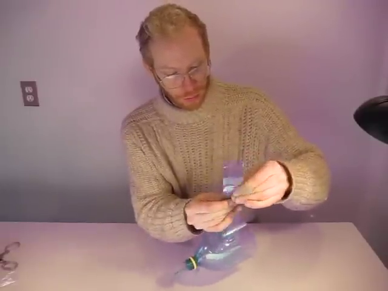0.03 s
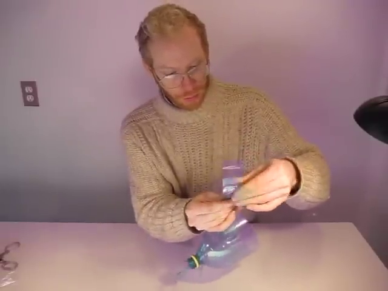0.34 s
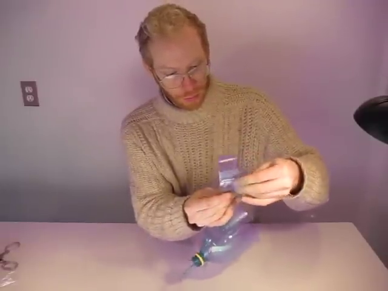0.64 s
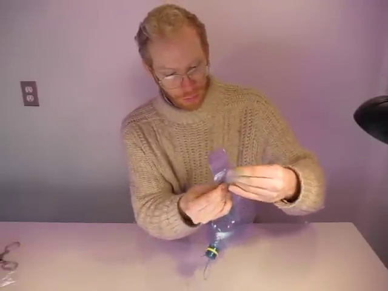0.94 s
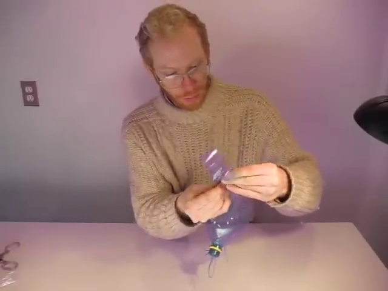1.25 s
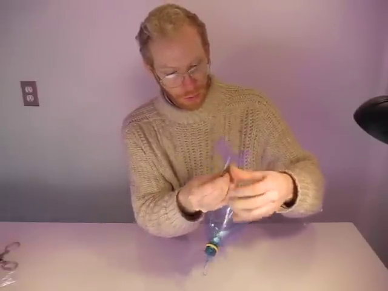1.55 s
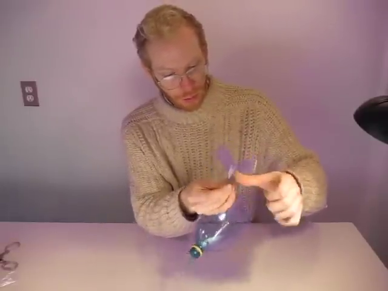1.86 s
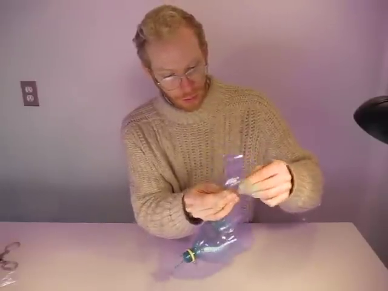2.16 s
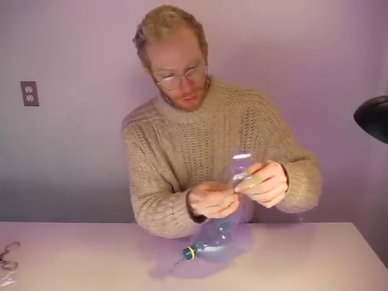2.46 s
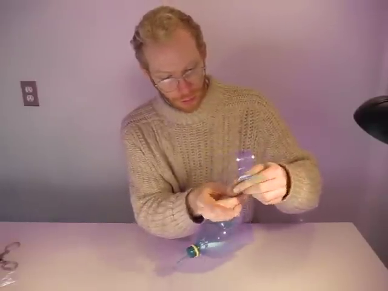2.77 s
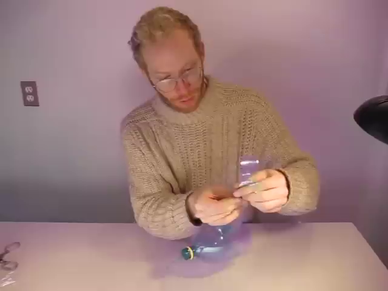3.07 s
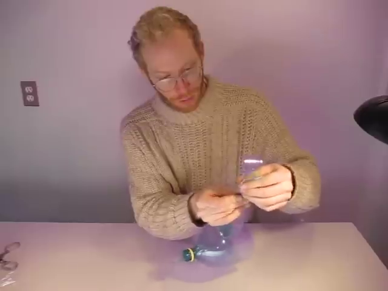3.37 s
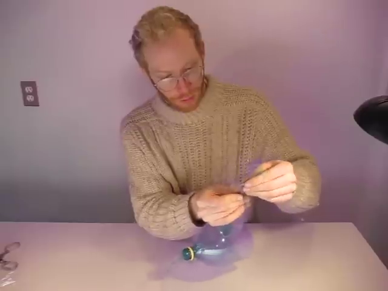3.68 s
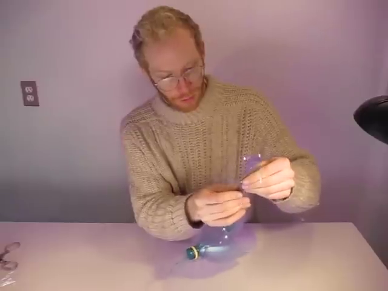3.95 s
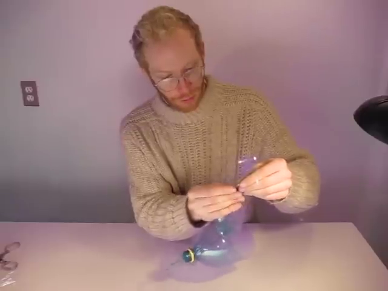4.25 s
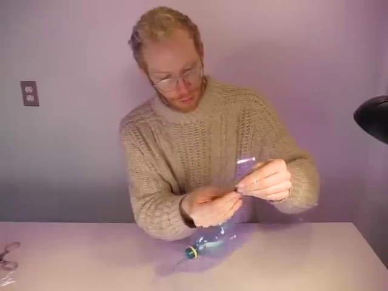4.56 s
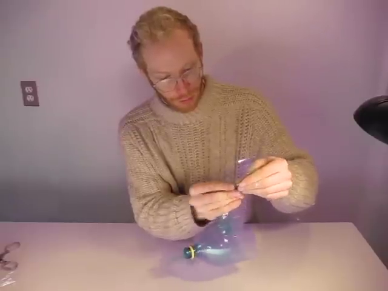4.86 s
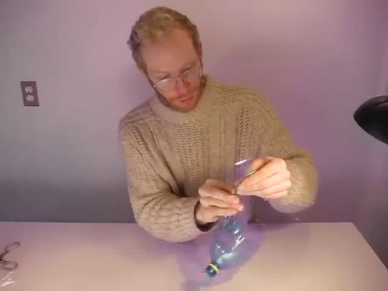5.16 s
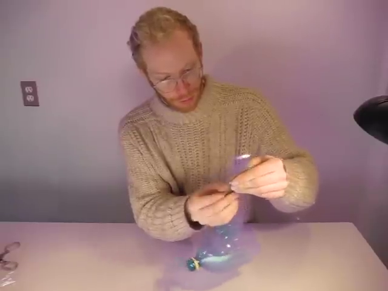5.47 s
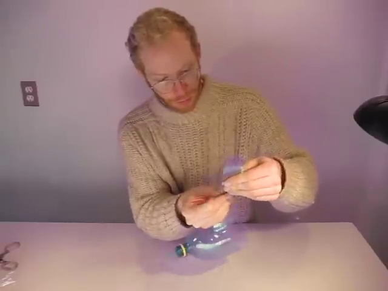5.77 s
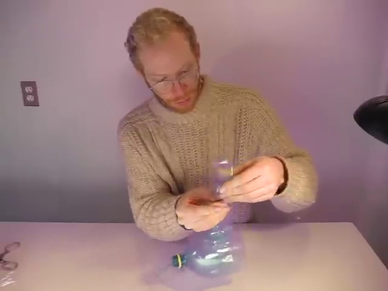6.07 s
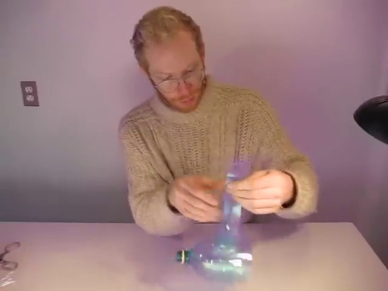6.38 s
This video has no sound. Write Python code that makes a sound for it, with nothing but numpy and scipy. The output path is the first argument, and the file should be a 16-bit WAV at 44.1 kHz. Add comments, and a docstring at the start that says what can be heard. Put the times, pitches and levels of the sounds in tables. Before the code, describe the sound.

Strips cut from a thin plastic bottle are bent and pushed together above a table in a small room. Sharp, irregular snaps open the sound and bunch into a quick crackle with a tiny squeak. A quieter stretch of rubbing and scattered clicks follows, then the snaps grow busier again, mixed with dull ticks and light hollow knocks. One microphone picks it all up over a low, steady ventilation hum.

```python
"""Sharp plastic snaps, with dull ticks, hollow knocks, rubbing and squeaks, over a low ventilation hum.
Strips cut from a thin bottle are bent and pushed into each other above a table in a small room.
The strips buckle and snap, the bottle wall ticks as it flexes, and jolts make the whole bottle knock.
Cut edges drag and squeak, fingers hiss. One microphone feeds both channels."""
import sys
import numpy as np
from scipy import signal
from scipy.fft import rfft, irfft, next_fast_len
from scipy.io import wavfile

SR = 44100
rng = np.random.default_rng(int(sys.argv[2]) if len(sys.argv) > 2 else 0)


def digitize_waveform(pressure):
    """Quantize a signal to 16-bit integers and store it at the path in sys.argv[1].

    Rows of a 2-D input are taken as channels; values are limited to [-1, 1].
    """
    field = np.atleast_2d(pressure).T
    bounded = np.clip(field, -1, 1)
    quanta = np.round(bounded * 32767).astype(np.int16)
    wavfile.write(sys.argv[1], SR, quanta)


N = 287532
TAIL_SAMPLES = SR // 3
ATTACK_SAMPLES = round(.011 * SR)  # span that sets a click's level

# Spectra: freq_hz, relative_db
HUM_SPECTRUM = [(11, -0.5), (18, 1.5), (43, -2.5), (69, -5), (96, -9), (151, -14.5), (193, -16), (342, -21),
                (400, -26), (520, -31.5), (880, -120)]  # ventilation rumble
AIR_SPECTRUM = [(180, -19.5), (300, -12.5), (392, -7), (584, -6.5), (645, -7.5), (1030, -10.5),
                (1320, -11.5), (2320, -15.5), (2790, -14), (4300, -17.5), (13000, -25), (16000, -32)]  # ventilation hiss
ROOM_SPECTRUM = [(200, -7.5), (700, 1), (2000, -0.5), (5000, -4), (9000, -3.5), (13000, -3), (15500, -14)]  # room reflections
CREASE_SPECTRUM = [(200, -28), (700, -10), (1500, -7), (2400, 3), (3600, 7), (6000, -1), (11000, -13),
                   (16000, -13)]  # tiny folds
DRAG_SPECTRUM = [(150, -21), (450, -6.5), (700, -3.5), (1200, -8.5), (2200, -2), (3500, 1), (4500, -3.5),
                 (5500, 0), (7000, -30), (14000, -34)]  # sliding cut edges
FINGER_SPECTRUM = [(300, -30), (2000, -17), (4000, 0.5), (6000, 3), (9000, 0.5), (13000, -4), (16000, -17)]  # sliding fingers
TICK_SPECTRUM = [(300, -22), (700, -13), (1400, -24), (1800, -14), (2200, 1), (2700, -5.5), (3500, 2.5),
                 (4100, -11.5), (4700, -9), (5400, -19), (6500, -19), (12000, -30)]  # flexing bottle wall
KNOCK_SPECTRUM = [(100, -27), (270, -2), (500, -1.5), (720, -4.5), (1100, -5.5), (1850, -9), (2600, -14),
                  (8000, -18)]  # jolted bottle

# Room decay: freq_hz, t60_s
ROOM_DECAY = [(200, 0.65), (800, 0.37), (2100, 0.5), (5500, 0.43), (10000, 0.38), (15000, 0.32)]
# Resonances of bottle and strips: freq_hz, width_hz, gain_db
BOTTLE_MODES = [(273, 42, -3), (505.4, 17, 3), (691.7, 27, 5.5), (840, 58, -6), (1156, 14, 0),
                (1290, 39, -2.5), (1853, 46, -5), (2225, 18, -9), (2563, 26, -15), (2910, 20, -3),
                (3860, 46, -5.5), (5270, 60, -7), (6500, 30, -24), (7100, 45, -6), (7800, 200, -15),
                (10600, 170, -34)]

# Event levels are relative within each layer.
# Edges and fingers sliding: start_s, length_s, drag_db, hiss_db
SLIDE_STROKES = [(0.088, 0.076, -66, -51.5), (.47, 0.086, -54, -53.5), (1.275, 0.163, -49, -53),
                 (1.452, 0.019, -51.5, -39), (1.866, 0.021, -48, -46.5), (1.904, 0.048, -51.5, -53),
                 (2.307, 0.26, -57, -65), (2.552, 0.14, -52, -56), (2.63, 0.01, -37, -45),
                 (3.065, 0.051, -73, -60), (3.135, 0.13, -54.5, -53), (3.256, 0.067, -52, -57.5),
                 (3.516, 0.065, -49.5, -52.5), (3.834, .14, -67, -66), (3.987, 0.021, -56, -56),
                 (4.748, .12, -56, -68), (4.91, 0.093, -57, -56.5), (5.06, 0.049, -48.5, -55),
                 (5.104, 0.025, -53, -43), (5.344, 0.14, -47.5, -59), (5.472, 0.094, -49, -57.5),
                 (5.548, 0.036, -36.5, -53), (5.69, 0.044, -49, -59), (5.742, 0.021, -36.5, -41),
                 (5.797, 0.064, -44.5, -66), (6.273, 0.053, -56, -60)]
# Edge skidding on edge: centre_s, pitch_hz, peak_db, half_length_s
EDGE_SQUEAKS = [(1.4746, 10260, -23, 0.0013), (1.4752, 8170, -30, 0.0021), (1.4923, 9720, -17.5, 0.00092)]
# Wall flexing: start_s, level_db
WALL_TICKS = [(1.422, -49), (2.766, -55), (2.919, -56.5), (3.109, -54.5), (3.379, -51), (3.502, -49),
              (4.54, -45.5), (5.03, -43.5), (5.046, -51), (5.255, -45), (5.451, -40), (5.573, -43.5),
              (5.584, -42), (5.6355, -38.5), (5.645, -43)]
# Bottle jolts: start_s, level_db, pitch_hz
BOTTLE_KNOCKS = [(.109, -45, 680), (.327, -41, 271), (.581, -44.5, 686), (.767, -46, 770),
                 (1.263, -48, 694), (1.505, -48, 400), (2.643, -41, 1090), (2.65, -40, 327),
                 (2.9, -55, 1840), (5.562, -51.5, 694), (5.59, -52, 675), (5.668, -53, 690),
                 (5.758, -42, 680), (5.83, -55, 740), (6.405, -37, 510)]
# Strips buckling: start_s, level_db, body_db, edge_db, slip_s, pitch_hz
# Body (near 600 Hz) and edge (11 kHz) are relative to 5 kHz.
STRIP_SNAPS = [(0.0514, -26.5, -18.5, -11, 0.0019, 5930), (.1652, -51, 2, 5, .0013, 5500),
               (.2036, -39.5, -8, -4.5, 0.00038, 4640), (0.3251, -26, -10.5, -16.5, .00023, 3500),
               (0.5798, -20.5, -16.5, -10, 0.00038, 4100), (0.6662, -40.5, -5.5, -21, 0.0014, 4710),
               (0.7663, -45.5, 2.5, -2, 0.00098, 8650), (1.1725, -46, -17, -3, .0006, 7020),
               (1.1893, -25.5, -23, 0.5, 0.00048, 7700), (1.247, -41, -24, -12, 0.0032, 3870),
               (1.2543, -30.5, -19, -26, 0.0016, 3900), (1.2629, -28.5, -19, -9, 0.0014, 3900),
               (1.271, -33, -6, -3, 0.002, 4000), (1.3055, -26, -14.5, -12.5, 0.00032, 2570),
               (1.3407, -34, -14, -2, 0.00092, 6790), (1.3681, -28, -14.5, -19, 0.00072, 3900),
               (1.4477, -42, -10, -17, .0015, 3870), (1.474, -30, -13, -13, 0.0043, 4590),
               (1.4915, -29, -15, -12, 0.0034, 9800), (2.0433, -54, -10, 3, 0.00056, 5970),
               (2.1963, -55, -14, -12, .002, 5400), (2.2705, -42.5, -7, -3, .0045, 3580),
               (2.4047, -48.5, -6, -6, 0.0056, 2900), (2.488, -52, -21, -9, 0.0023, 6230),
               (2.5659, -40.5, -3.5, -4, 0.0066, 2580), (2.641, -38.5, -2, -8, 0.0022, 2660),
               (2.6492, -31, -4.5, -7.5, 0.0035, 1840), (3.139, -54, -10, 6, .0009, 9900),
               (3.6418, -37.5, -1, -8.5, 0.0023, 6940), (3.6497, -37, 5.5, -27, .0035, 3280),
               (4.0035, -41, -6.5, -8, 0.0032, 3570), (4.1124, -43.5, 3, -12, .002, 5000),
               (4.1192, -31, -1.5, 3.5, .0002, 3670), (4.1368, -31.5, -16, -4, 0.0004, 6250),
               (4.2365, -32, -15, -1.5, 0.0011, 6500), (4.6181, -53.5, 0, 2, .0003, 4070),
               (4.8583, -47.5, -13, -7, 0.00092, 5640), (4.8777, -36.5, -12, -6, 0.0019, 4110),
               (4.9914, -34.5, -9, 7.5, .003, 8240), (5.1409, -23.5, -23, -1, 0.0015, 4100),
               (5.16, -25.5, -10, -4.5, 0.0034, 5250), (5.557, -39, 3, -12, 0.00095, 3600),
               (5.668, -40, -7, -18, 0.0022, 2980), (5.758, -24, -8, -6.5, .0012, 4070),
               (5.9386, -28, -23, -8.5, 0.0014, 4900), (5.9491, -29, -19, -2.5, 0.00013, 6460),
               (6.1008, -40.5, -1, -10, .0025, 4790), (6.1092, -35.5, -18, -6, .0046, 6940),
               (6.1322, -31, -2.5, -7, 0.0011, 4000), (6.1451, -33.5, -10, -6, 0.0012, 3870),
               (6.386, -50, -10, -8, 0.0027, 4500), (6.4048, -22.5, -9.5, -10, .0004, 3730)]


def amp(db):
    """Decibels to gain."""
    return 10 ** (np.asarray(db) / 20)


def unit_rms(x):
    """Scale to rms 1."""
    return x / np.sqrt(np.mean(x ** 2) + 1e-20)


def log_interp(points, hz):
    """Read (freq_hz, value) points on a log frequency axis."""
    freq_hz, values = np.transpose(points)
    return np.interp(np.log(hz + 1), np.log(freq_hz + 1), values)


def coloured(x, spectrum):
    """Minimum-phase filter from (freq_hz, gain_db) points."""
    size = 2 * next_fast_len(len(x))
    gain = amp(log_interp(spectrum, np.fft.rfftfreq(size, 1 / SR)))
    cepstrum = irfft(np.log(gain), size)
    cepstrum[1:size // 2] *= 2
    cepstrum[size // 2 + 1:] = 0
    return irfft(rfft(x, size) * np.exp(rfft(cepstrum)), size)[:len(x)]


def resonate(x, modes):
    """x plus its ringing in (freq_hz, width_hz, gain_db) modes."""
    size = next_fast_len(len(x) + SR // 4)
    f = np.fft.rfftfreq(size, 1 / SR)
    ringing = sum(amp(db) * 1j * f * width_hz / (hz ** 2 - f ** 2 + 1j * f * width_hz)
                  for hz, width_hz, db in modes)
    return irfft(rfft(x, size) * (1 + ringing), size)[:len(x)]


def add(track, start_s, x):
    """Mix x into track at start_s."""
    part = track[max(round(start_s * SR), 0):][:len(x)]
    part += x[:len(part)]


def at_level(click, level_db, onset=0):
    """Scale a click so its attack, from sample onset, has rms level_db."""
    return click * amp(level_db) / np.std(click[onset:][:ATTACK_SAMPLES])


def room_tail(build_s=0.0033):
    """Fresh diffuse tail, each frequency dying at its own rate; energy 1."""
    hz, frame_s, noise = signal.stft(rng.standard_normal(TAIL_SAMPLES), SR, nperseg=256)
    decay_db = 60 * frame_s / log_interp(ROOM_DECAY, hz)[:, None]
    gain = amp(log_interp(ROOM_SPECTRUM, hz)[:, None] - decay_db)
    tail = signal.istft(noise * gain, SR, nperseg=256)[1][:TAIL_SAMPLES]
    tail *= 1 - np.exp(-(np.arange(TAIL_SAMPLES) / SR / build_s) ** 2)
    return tail / np.linalg.norm(tail)


def in_room(x, wet_db):
    """x plus room reflections."""
    return x + amp(wet_db) * signal.fftconvolve(x, room_tail())[:len(x)]


def ventilation(hum_db=-49.5, air_db=-59.0):
    """Moving air: steady low hum, faint hiss."""
    hum = unit_rms(coloured(rng.standard_normal(N + SR), HUM_SPECTRUM)[SR:])
    air = unit_rms(coloured(rng.standard_normal(N + SR), AIR_SPECTRUM)[SR:])
    return amp(hum_db) * hum + amp(air_db) * air


def buckle(slip_s, sharpness=5, soft_slip_s=0.0027, flutter_db=-4, flutter_t60_s=0.043,
           table_delay_s=0.0012, table_gain=0.33):
    """A sharp slip, its table reflection, a dying run of smaller slips, bending waves; energy 1."""
    t = np.arange(TAIL_SAMPLES) / SR
    spike = sharpness * np.exp(-slip_s / soft_slip_s)  # slow folds start softly
    run = np.exp(-t / slip_s) * (1 - np.exp(-6 * t / slip_s))
    slip_size = np.hypot(np.linalg.norm(run), spike)
    flutter = amp(-60 * t / flutter_t60_s) * (1 - np.exp(-t / slip_s))
    flutter *= amp(flutter_db) * slip_size / np.linalg.norm(flutter)
    wave = rng.standard_normal(len(t)) * np.hypot(run, flutter)
    wave[0] = spike
    wave[round(table_delay_s * SR)] += table_gain * spike
    return wave / np.linalg.norm(wave)


def creases(rate_per_s=8, mean_db=-67, spread_db=10):
    """Tiny folds give way at random in the held strips."""
    track = np.zeros(N)
    for place, size in rng.random((round(rate_per_s * N / SR), 2)):
        crease = coloured(buckle(slip_s=0.0023), CREASE_SPECTRUM)
        level_db = mean_db + spread_db * (2 * size - 1)
        add(track, place * N / SR, at_level(crease, level_db))
    return in_room(track, wet_db=-8)


def friction(spectrum, slips_per_s, smooth_gain):
    """Tiny uneven slips over smooth sliding noise; rms 1."""
    slips = (rng.random(N) < slips_per_s / SR) * rng.standard_normal(N)
    sliding = smooth_gain * rng.standard_normal(N)
    return unit_rms(coloured(unit_rms(slips) + sliding, spectrum))


def rubbing(grip_s=0.0066, swell_db=5.5, release_s=.012):
    """Edges drag coarsely, fingers hiss finely; each stroke grips, swells with pressure, lets go."""
    t = np.arange(N) / SR
    drag_envelope, hiss_envelope = np.zeros((2, N))
    for start_s, length_s, drag_db, hiss_db in SLIDE_STROKES:
        age_s = t - start_s
        grip = np.clip(age_s / grip_s, 0, 1)
        pressure = amp(swell_db * (np.clip(age_s / length_s, 0, 1) - 1.5))
        release = np.exp(-np.maximum(age_s - length_s, 0) / release_s)
        stroke = grip * pressure * release
        drag_envelope += amp(drag_db) * stroke
        hiss_envelope += amp(hiss_db) * stroke
    drag = drag_envelope * friction(DRAG_SPECTRUM, slips_per_s=700, smooth_gain=0.96)
    hiss = hiss_envelope * friction(FINGER_SPECTRUM, slips_per_s=2500, smooth_gain=0.93)
    return in_room(amp(-2.5) * drag + amp(3.0) * hiss, wet_db=-7)


def squeaks(glide=0.0098):
    """Fast stick-slip: milliseconds of whistle, rising as the edge speeds up."""
    track, t = np.zeros(N), np.arange(-SR // 100, SR // 100) / SR
    for centre_s, pitch_hz, peak_db, half_length_s in EDGE_SQUEAKS:
        phase = 2 * np.pi * np.cumsum(pitch_hz * (1 + glide * t / half_length_s)) / SR
        envelope = amp(peak_db) * np.exp(-(t / half_length_s) ** 2)
        add(track, centre_s + t[0], envelope * np.sin(phase))
    return in_room(track, wet_db=-13)


def dense_ring(spectrum, t60_s, rise_s, wet_db):
    """Crowded modes ring as decaying noise, with a room tail."""
    t = np.arange(TAIL_SAMPLES) / SR
    ring = rng.standard_normal(len(t)) * amp(-60 * t / t60_s) * (1 - np.exp(-t / rise_s))
    return coloured(ring / np.linalg.norm(ring) + amp(wet_db) * room_tail(), spectrum)


def ticks():
    """The stiffer bottle wall gives a little; its mid-range modes ring briefly."""
    track = np.zeros(N)
    for start_s, level_db in WALL_TICKS:
        tick = dense_ring(TICK_SPECTRUM, t60_s=0.094, rise_s=0.00013, wet_db=-9)
        add(track, start_s, at_level(tick, level_db))
    return track


def knocks(q=7, note_db=6):
    """The jolted bottle answers with a short hollow note."""
    track = np.zeros(N)
    for start_s, level_db, pitch_hz in BOTTLE_KNOCKS:
        jolt = dense_ring(KNOCK_SPECTRUM, t60_s=0.042, rise_s=0.00031, wet_db=-10)
        knock = resonate(jolt, [(pitch_hz, pitch_hz / q, note_db)])
        add(track, start_s, at_level(knock, level_db))
    return track


def lead_in(samples, creep_db=-13, creep_s=0.0012, cracks=3, crack_db=-21, crack_decay_s=.0007,
            spread_db=7, span_s=.014, fade_db=18):
    """The edge creeps and cracks just before a snap; earlier cracks are weaker."""
    remaining_s = np.arange(samples, 0, -1) / SR
    envelope = amp(creep_db) * np.exp(-remaining_s / creep_s) / np.sqrt(ATTACK_SAMPLES)
    level_db = crack_db - spread_db * rng.random()
    for earliness in rng.random(cracks):
        age_s = earliness * span_s - remaining_s
        crack = (age_s > 0) * np.exp(-np.abs(age_s) / crack_decay_s) / np.sqrt(crack_decay_s * SR / 2)
        envelope += amp(level_db - fade_db * earliness) * crack
    return envelope * rng.standard_normal(samples)


def fold_spectrum(body_db, edge_db, pitch_hz, mid_db_per_octave=8, reference_hz=4390):
    """Fuller, lower folds carry more mid-range; returns (freq_hz, gain_db) points."""
    mid_db = 0.5 * body_db + mid_db_per_octave * np.log2(reference_hz / pitch_hz)
    return [(60, body_db - 24), (260, body_db - 2.5), (600, body_db - 3),
            (1200, 0.83 * body_db + 0.16 * mid_db - 2), (2100, mid_db), (3300, 0.49 * mid_db),
            (4600, 1.0), (6000, -0.8), (11000, edge_db), (14500, edge_db - 4.5), (16000, edge_db - 23)]


def fold_modes(pitch_hz, q=14, main_db=-1, side_db=-4, count=7):
    """The buckling patch has one main resonance and weaker random ones."""
    side_hz = 1500 * 7 ** ((np.arange(count) + rng.random(count)) / count)
    return [(pitch_hz, pitch_hz / q, main_db)] + [(hz, hz / (2 * q), side_db) for hz in side_hz]


def snaps(wet_db=-8, lead_samples=SR // 40):
    """Strips buckle: big folds sound low and full, small ones thin."""
    track = np.zeros(N)
    for start_s, level_db, body_db, edge_db, slip_s, pitch_hz in STRIP_SNAPS:
        lead = lead_in(lead_samples)
        burst = buckle(slip_s) + amp(wet_db) * room_tail()
        snap = coloured(np.concatenate([lead, burst]), fold_spectrum(body_db, edge_db, pitch_hz))
        snap = resonate(snap, fold_modes(pitch_hz))
        add(track, start_s - lead_samples / SR, at_level(snap, level_db, onset=lead_samples))
    return track


def scene():
    """All plastic sounds ring the bottle, over the ventilation; same signal on both channels."""
    plastic = snaps() + ticks() + amp(-0.5) * knocks() + squeaks() + rubbing() + creases()
    return np.tile(resonate(plastic, BOTTLE_MODES) + ventilation(), (2, 1))


def record(dry):
    """Brick-wall low-pass."""
    cutoff_hz = 15900
    size = next_fast_len(N + SR // 2)
    passband = np.fft.rfftfreq(size, 1 / SR) < cutoff_hz
    return irfft(rfft(dry, size) * passband, size)[:, :N]


dry = scene()
out = record(dry)
digitize_waveform(out)
```